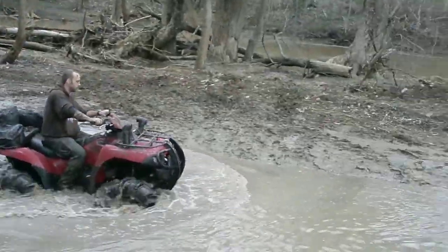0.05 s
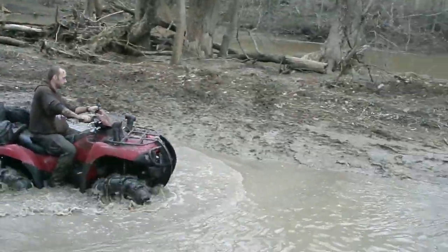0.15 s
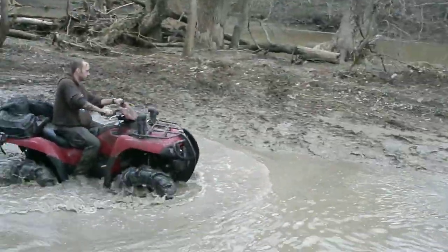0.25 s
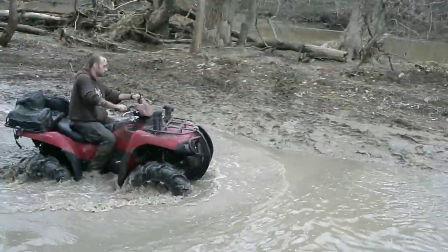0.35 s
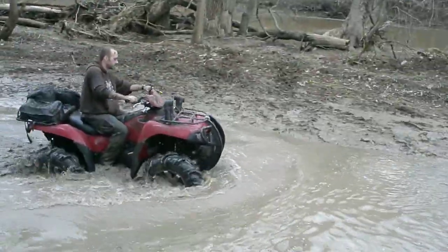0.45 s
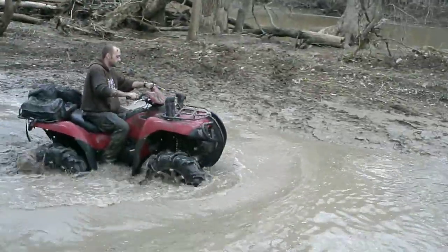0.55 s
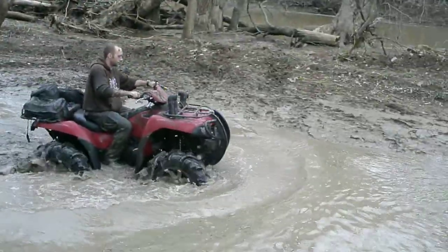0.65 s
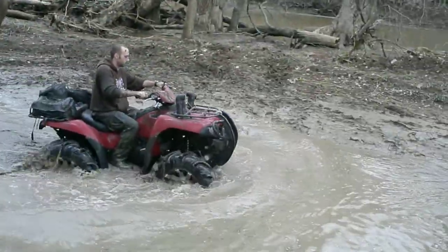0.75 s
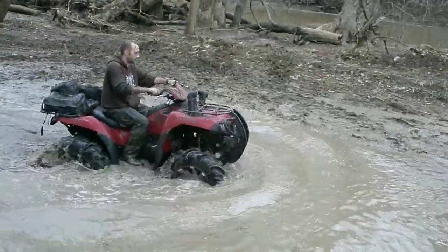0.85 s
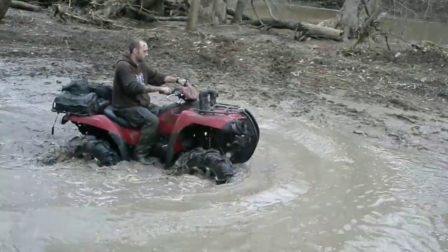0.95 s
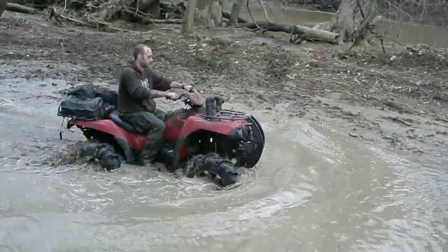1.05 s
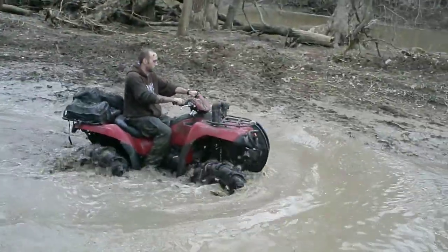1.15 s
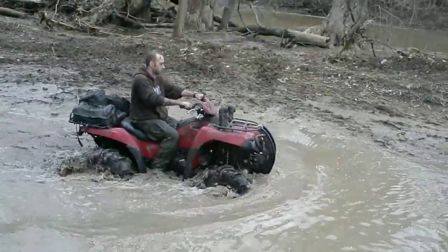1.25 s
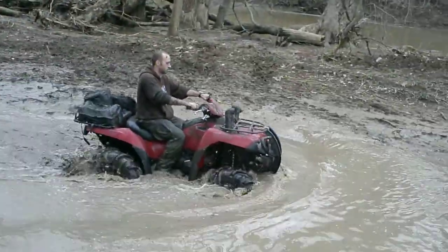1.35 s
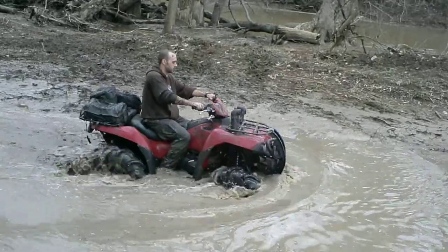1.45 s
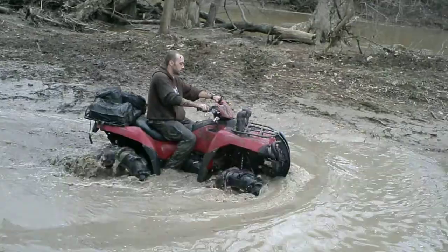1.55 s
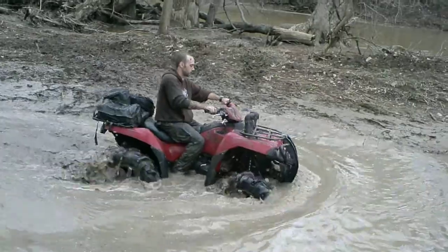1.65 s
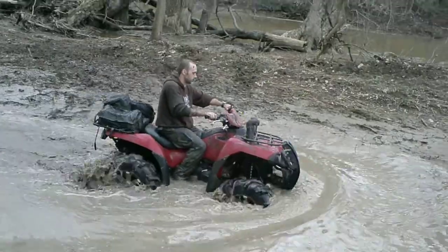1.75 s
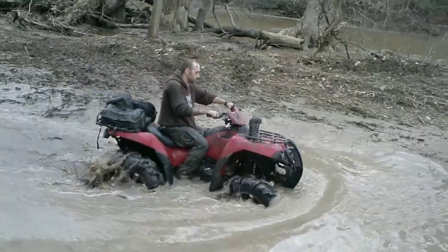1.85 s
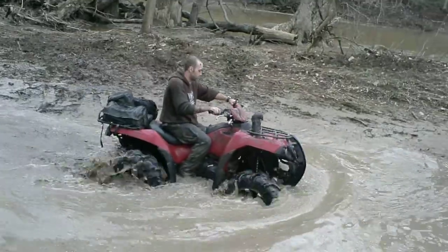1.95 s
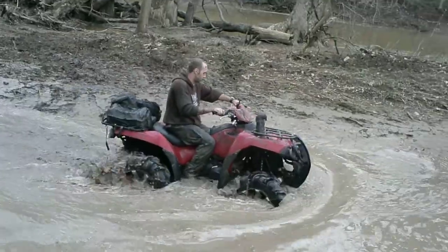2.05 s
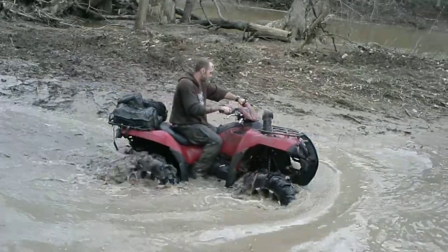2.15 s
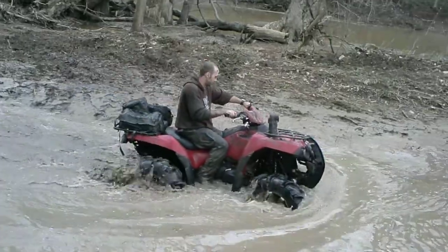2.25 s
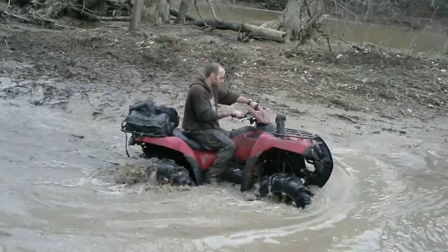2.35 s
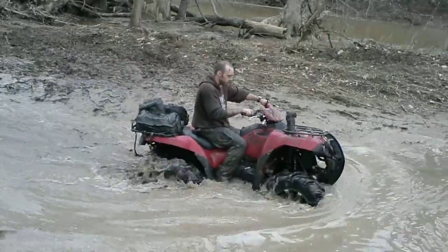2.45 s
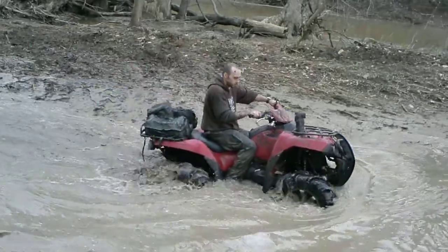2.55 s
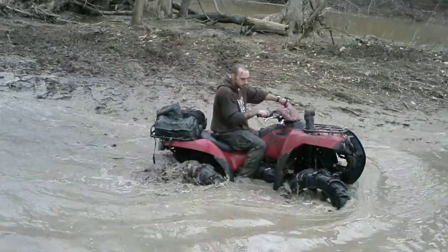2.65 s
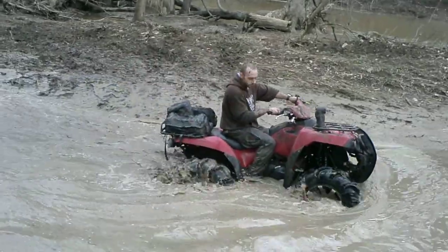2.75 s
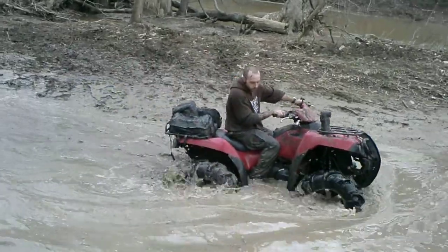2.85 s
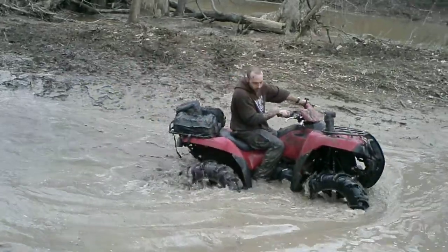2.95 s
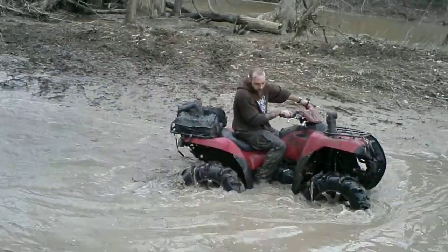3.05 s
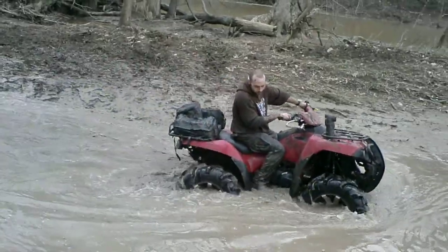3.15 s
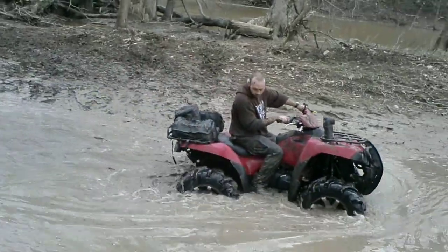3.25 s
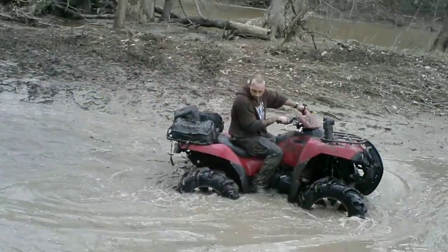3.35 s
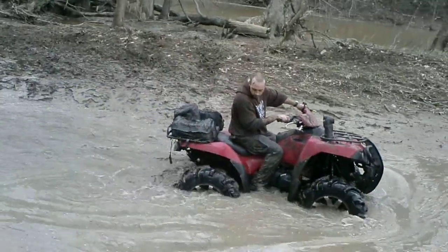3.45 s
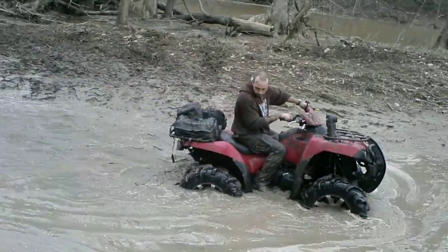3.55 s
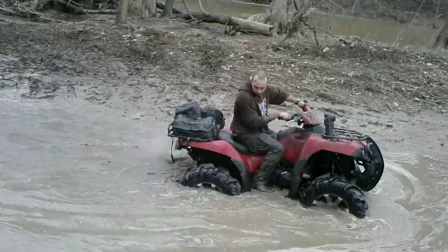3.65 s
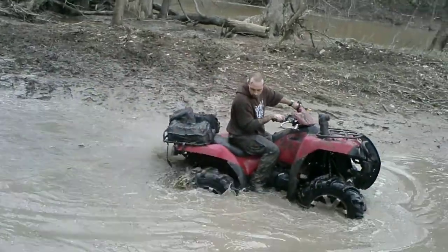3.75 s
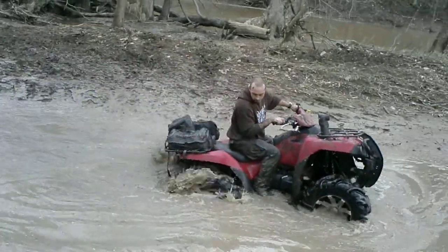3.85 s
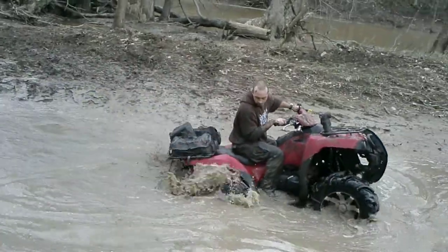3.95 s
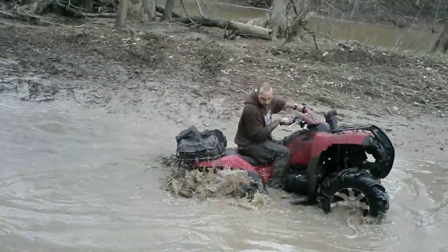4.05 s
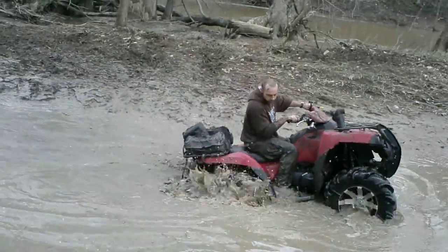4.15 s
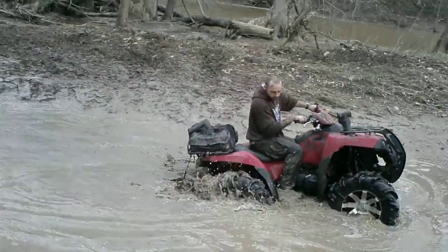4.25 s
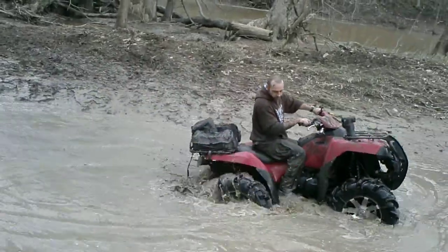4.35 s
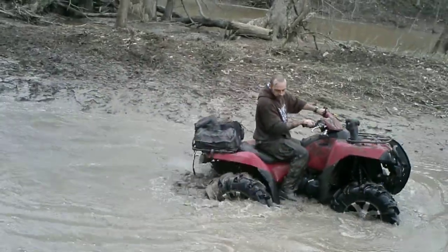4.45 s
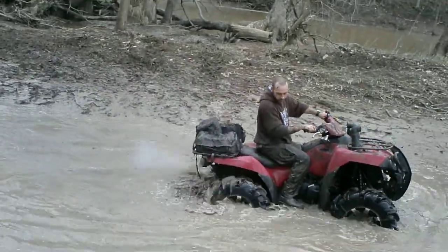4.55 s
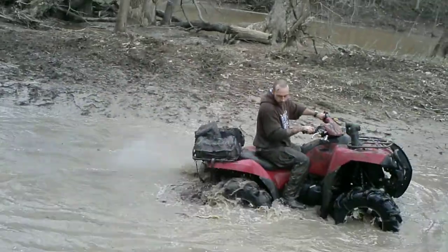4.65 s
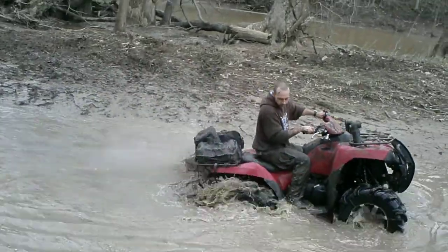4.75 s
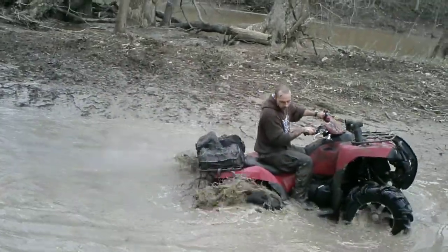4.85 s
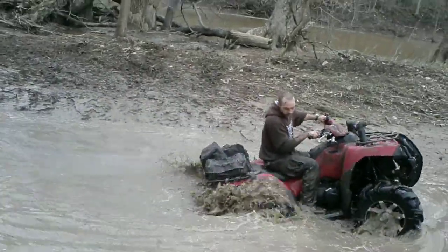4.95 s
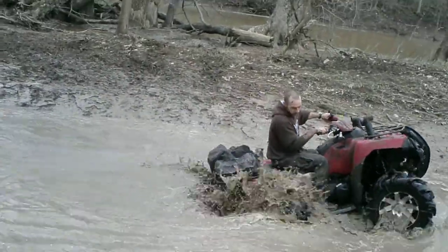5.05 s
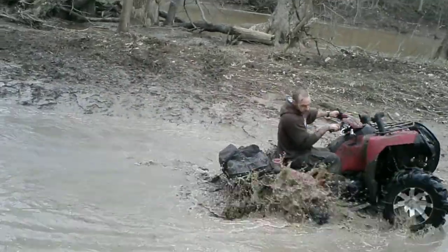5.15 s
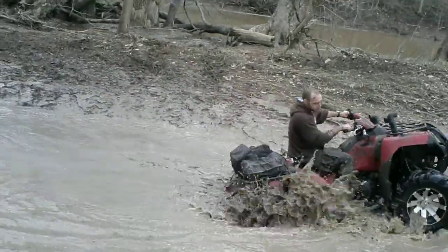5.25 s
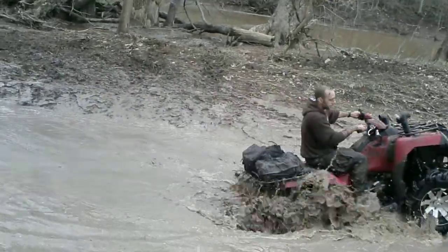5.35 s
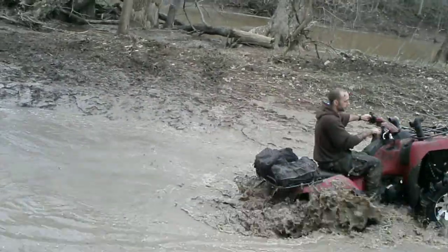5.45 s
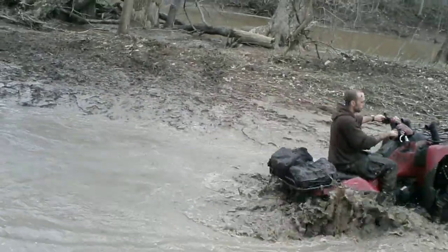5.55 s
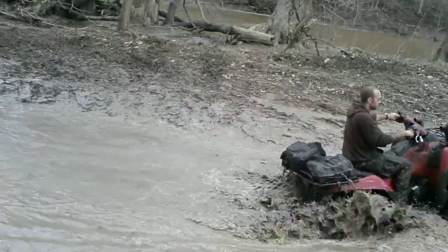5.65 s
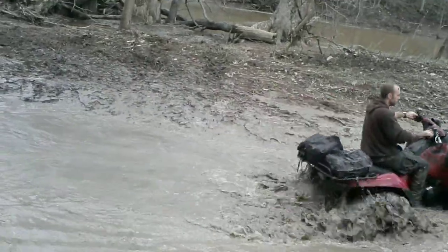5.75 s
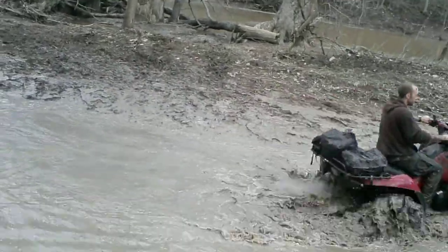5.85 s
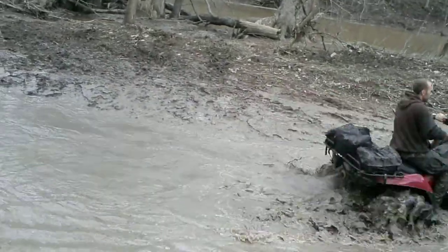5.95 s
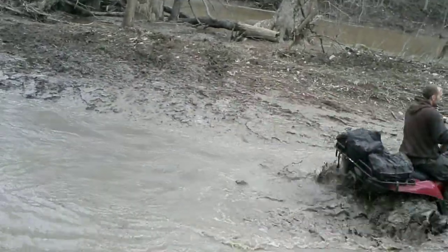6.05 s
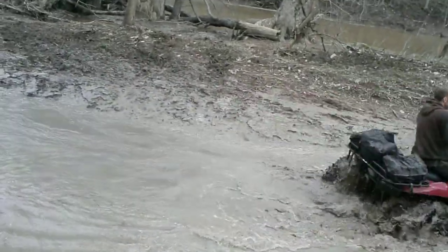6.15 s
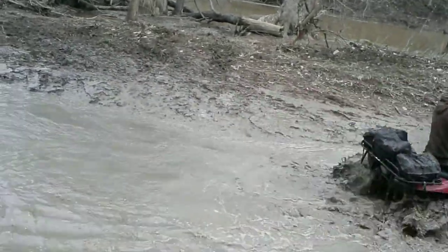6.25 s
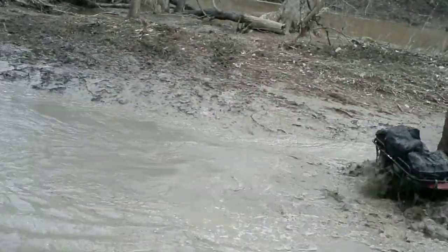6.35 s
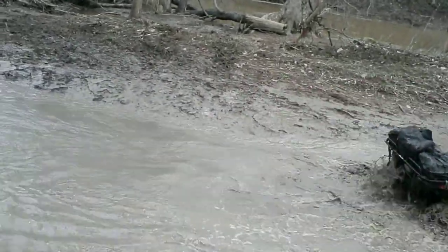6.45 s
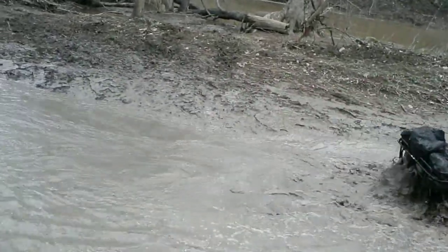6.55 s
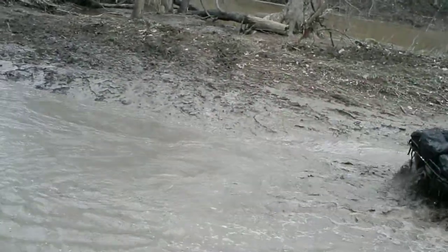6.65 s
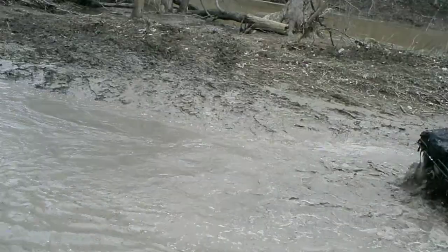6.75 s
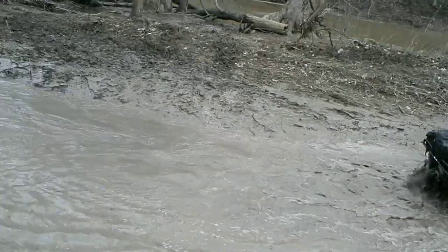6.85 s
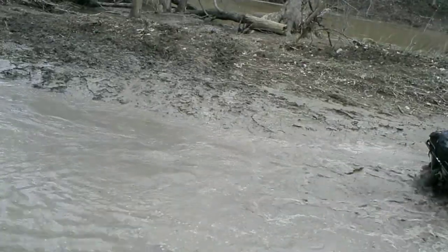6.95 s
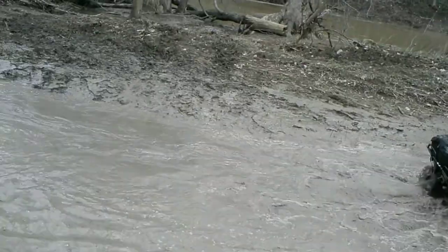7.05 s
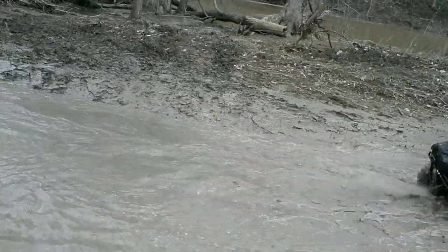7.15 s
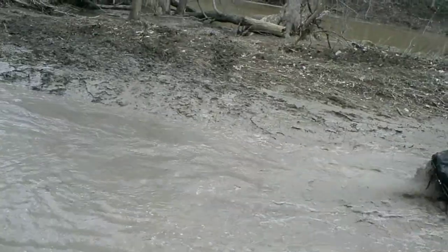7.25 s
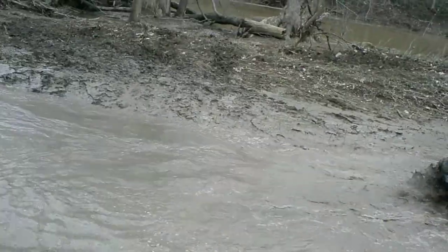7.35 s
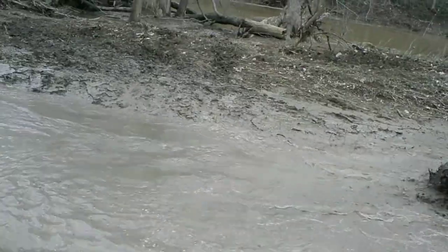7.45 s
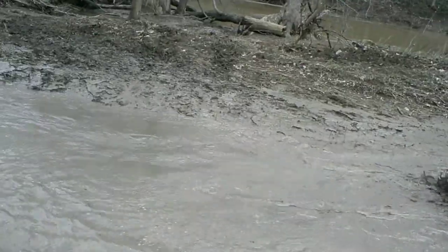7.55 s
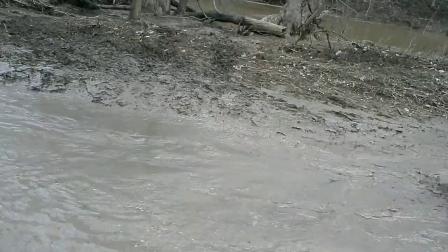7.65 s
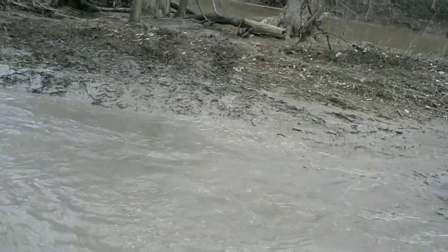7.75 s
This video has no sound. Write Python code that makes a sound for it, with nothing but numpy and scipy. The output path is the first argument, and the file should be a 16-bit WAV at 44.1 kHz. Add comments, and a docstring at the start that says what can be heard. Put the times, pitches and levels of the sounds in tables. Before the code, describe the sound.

A quad bike's uneven twin-cylinder engine labours through muddy water, drops to a lumpy idle, then barks in repeated throttle bursts amid splashes and churning.

```python
"""A quad bike with a V-twin engine cruises unevenly through muddy water in open woods, wash and splashes around it.
After some 2.7 s it drops to idle; from 3.5 s the rider blips the throttle again and again and mud keeps flying.
Near 5 s, as the revs drop, the drive belt squeals once. Dull echoes follow every sound; loud peaks are cut flat.
Each firing sends a pulse down the exhaust, where it echoes and rings tuned modes, and rasps in the headers.
Gas roar and water are coloured noise, partly puffing with the firings."""
import sys
import numpy as np
from scipy import signal
from scipy.fft import rfft, irfft, next_fast_len
from scipy.io import wavfile
from scipy.ndimage import uniform_filter1d

SR = 44100
rng = np.random.default_rng(int(sys.argv[2]) if len(sys.argv) > 2 else 0)


def volts_from_db(level):
    """Convert decibel levels to linear amplitude ratios."""
    exponent = np.asarray(level, float) / 20
    return 10 ** exponent


def log_audio(samples):
    """Write samples as a 16-bit WAV file to the path given in sys.argv[1]."""
    # one column per channel
    frames = np.atleast_2d(samples).T
    # limit to full scale, then quantise
    limited = np.clip(frames, -1, 1)
    pcm = np.round(limited * 32767).astype(np.int16)
    wavfile.write(sys.argv[1], SR, pcm)


N = 343539   # length in samples
CRUISE_THROTTLE = 0.095
IDLE_RPM = 1400
RISE_S = .0038   # from valve opening to the crest of the pulse


def rms_one(x):
    """Scale to rms 1."""
    return x / np.sqrt(np.mean(x ** 2) + 1e-20)


def in_time(rows):
    """Each column of a curve table, interpolated at every sample."""
    s, *columns = np.transpose(rows)
    return [np.interp(np.arange(N) / SR, s, c) for c in columns]


def coloured(x, spectrum):
    """Filter x by a (Hz, dB) curve, then bring it to rms 1."""
    size = next_fast_len(N)
    hz, db = np.transpose(spectrum)
    bins_hz = np.arange(size // 2 + 1) * SR / size
    gain = volts_from_db(np.interp(np.log(bins_hz + 1), np.log(hz), db))
    return rms_one(irfft(rfft(x, size) * gain, size)[:N])


def fading(x, seconds):
    """One-pole decay: each click leaves an exponential tail with this time constant."""
    return signal.lfilter([1], [1, -np.exp(-1 / (seconds * SR))], x + 1e-18)


def drift(rate):
    """Random wander with spread 1: noise twice smoothed at this rate in Hz."""
    tail_s = 1 / (2 * np.pi * rate)
    slow = fading(fading(rng.standard_normal(N + SR), tail_s), tail_s)
    return rms_one(slow[SR:])   # the first second lets the filters settle


def evened(x, rpm):
    """Level made independent of how often the engine fires."""
    return rms_one(x / np.sqrt(rpm))


def power_sum(*dbs):
    """Levels of unrelated sounds added, in dB."""
    return 20 * np.log10(np.sqrt(sum(volts_from_db(db) ** 2 for db in dbs)))


# Crankshaft speed before the flywheel rounds it. Each row: time in seconds, speed in rpm.
CRANK = [(0.0, 2640), (0.26, 2122), (0.64, 2752), (1.1, 2897), (1.41, 2449), (1.73, 3181), (2.03, 2737),
         (2.27, 3020), (2.57, 2707), (2.74, 1768), (3.02, 1365), (3.51, 1453), (3.75, 4575), (3.83, 4845),
         (4.07, 2517), (4.41, 1331), (4.6, 3648), (4.92, 5731), (5.14, 4106), (5.36, 4882), (5.58, 2583),
         (5.75, 1875), (5.99, 4136), (6.17, 3227), (6.47, 2955), (6.65, 1970), (6.83, 1540), (7.09, 4618),
         (7.24, 5533), (7.5, 2766), (7.62, 2481), (7.79, 3904)]


def crank_speed():
    """Engine speed in rpm; flywheel inertia rounds every turn of it."""
    flywheel_s = .06
    return uniform_filter1d(in_time(CRANK)[0], round(flywheel_s * SR), mode="nearest")


def firings(rpm):
    """Valve-opening sample and strength of each firing: two per 720 degrees, unevenly spaced."""
    start_cycles = -.62   # crank position at the start, in four-stroke cycles
    second_cylinder = .365   # cycles after the first: the uneven beat of a V-twin
    second_db, spread_db = .5, .8
    cycles = start_cycles + np.cumsum(rpm / 120) / SR
    whole = np.arange(int(cycles[-1]) + 1)
    marks = np.stack([whole, whole + second_cylinder], axis=1).ravel()
    marks = marks[marks < cycles[-1]]
    db = second_db * (np.arange(len(marks)) % 2) + spread_db * rng.standard_normal(len(marks))
    at = np.searchsorted(cycles, marks) - round(RISE_S * SR)
    return np.clip(at, 0, N - 200), volts_from_db(db)


def opening(opens, shuts):
    """0 to 1 while the throttle is held: the thumb snaps it open, the spring eases it shut."""
    opening_s, shutting_s = .012, .08   # shuts is the moment when it is half way back
    s = np.arange(N) / SR
    return np.clip(np.minimum((s - opens) / opening_s, (shuts - s) / shutting_s + .5), 0, 1)


# Throttle openings. Each row: opens in seconds, half shut in seconds, throttle from 0 to 1,
# gas roar at the opening in dB, basic low boom in dB against the pulses.
BLIPS = [(3.542, 3.807, 0.86, -12, 2), (4.452, 4.754, 0.66, -17, -1), (4.843, 4.99, 0.05, -25, 3.5),
         (5.155, 5.342, 0.6, -15.5, 3.5), (5.795, 6.02, 0.44, -39, -13), (6.853, 7.263, 0.71, -18, -0.5),
         (7.605, 7.762, 0.53, -17.5, -6)]


def rider(rpm):
    """Throttle, overrun share, and the boom, gas roar and crack levels that follow the openings."""
    roar_swell_db_per_s = 11.5   # the roar grows while the throttle is held
    crack_db = -17.5   # treble of the gas puffs against their opening roar
    kick_db, kick_s = 4, 0.35   # the first firings of an opening crack harder
    overrun_rpm_per_s = 6630   # slowing this fast is a full overrun
    cruise_boom_db, idle_boom_db, overrun_boom_db, boom_wander_db = 1.5, 4.5, 6, 3
    throttle, boom_db = np.full(N, CRUISE_THROTTLE), np.full(N, cruise_boom_db)
    gas, crack = np.full(N, 1e-6), np.full(N, 1e-6)
    for opens, shuts, depth, roar_db, low_db in BLIPS:
        held = opening(opens, shuts)
        since = np.clip(np.arange(N) / SR - opens, 0, 1)
        throttle += held * (depth - CRUISE_THROTTLE)
        gas += held * volts_from_db(roar_db + roar_swell_db_per_s * since)
        crack += held * volts_from_db(roar_db + crack_db + kick_db * np.exp(-since / kick_s))
        boom_db += held * (low_db - cruise_boom_db)
    slowing = np.clip(-np.gradient(rpm) * SR / overrun_rpm_per_s, 0, 1)
    overrun = slowing ** 2 * (1 - throttle)
    boom_db += idle_boom_db * (IDLE_RPM / rpm) ** 2 + overrun_boom_db * overrun
    boom_db += boom_wander_db * drift(2.0)
    return throttle, overrun, boom_db, 20 * np.log10(gas), 20 * np.log10(crack)


def pipe_gas(rpm, throttle, overrun):
    """Echo round trip in ms, echo share and turbulence in dB of the gas in the pipe."""
    # hot gas at speed carries sound faster; unburnt or freshly opened gas is cooler
    hot_trip_ms, idle_extra_ms, overrun_extra_ms, open_extra_ms = 5.313, 4.21, 1.3, 1
    slow = (IDLE_RPM / rpm) ** 1.405
    trip_ms = hot_trip_ms + idle_extra_ms * slow + overrun_extra_ms * overrun + open_extra_ms * throttle
    # an open throttle damps the echo
    echo = np.clip(0.59 - 0.56 * throttle - 0.16 * overrun, .03, .9)
    # least turbulence at an even cruise, most on the overrun
    cruise_db, idle_more_db, open_more_db, overrun_more_db = -26, 6, 11, 15
    turbulence_db = cruise_db + idle_more_db * slow ** 2
    turbulence_db += open_more_db * np.sqrt(throttle) + overrun_more_db * overrun
    return trip_ms, echo, turbulence_db


# How hard the cylinders fire. Each row: time in seconds, level of the exhaust pulses in dB.
EFFORT = [(0.0, -14), (0.19, -16.5), (0.5, -11.5), (2.56, -12.5), (2.84, -27), (3.47, -20.5), (3.56, -6.5),
          (3.82, -14), (3.86, -20.5), (4.27, -30.5), (4.32, -21), (4.42, -27), (4.47, -9), (4.75, -5.5),
          (4.9, -15.5), (4.95, -14), (5.01, -34), (5.08, -22.5), (5.21, -5.5), (5.29, -6), (5.49, -22),
          (5.6, -15), (5.73, -20.5), (5.75, -2), (5.77, -25), (5.81, -4), (6.09, -15), (6.4, -12.5),
          (6.75, -23), (6.81, -23), (6.88, -4.5), (7.24, -11.5), (7.31, -22.5), (7.62, -11), (7.68, 3),
          (7.79, -15.5)]


def effort():
    """Exhaust pulse level in dB, following the work of the cylinders."""
    return in_time(EFFORT)[0]


def ringing(flow, modes):
    """Parallel modes driven by a soft-edged flow; the tail pipe passes no deep bass."""
    flow, out = fading(flow, .0003), 0
    for hz, db, t60, polarity in modes:
        r = volts_from_db(-60 / (t60 * SR))
        w = 2 * np.pi * hz / SR
        mode = signal.lfilter([0, np.sin(w)], [1, -2 * r * np.cos(w), r * r], flow)
        out = out + polarity * volts_from_db(db) * mode
    return signal.sosfilt(signal.butter(3, 58, "high", fs=SR, output="sos"), out)


# Boom of the silencer can.
# Each row: frequency in Hz, relative level in dB, 60 dB decay in seconds, signed weight.
CAN = [(53.3, -25.5, 0.21, 0.84), (95, -6, 0.035, 0.79), (143.7, -16, 0.058, -0.7)]
# Bark of the silencer chambers.
# Each row: frequency in Hz, relative level in dB, 60 dB decay in seconds, signed weight.
CHAMBERS = [(170.7, -19, 0.19, 0.76), (207, 7.5, 0.011, -1.033), (262.3, -17.5, 0.049, -1.81),
            (295.7, 2, 0.018, 1), (349.4, -16, 0.087, 1), (421.7, -23.5, 0.015, -0.96),
            (550, -35, 0.051, 1), (676, -29, 0.0077, -0.41)]


def exhaust(at, strength, rpm, pulse_db, boom_db, gas):
    """Each pulse runs up and down the pipe and rings the silencer, over turbulent rumble."""
    trip_ms, echo, turbulence_db = gas
    flow = np.zeros(N)
    # even power whatever the firing rate and echo share
    size = strength * volts_from_db(pulse_db[at]) * np.sqrt((1 - echo[at] ** 2) / rpm[at])
    for k in range(7):   # the pulse and six echoes
        late = np.minimum(at + np.round(k * trip_ms[at] * SR / 1000).astype(int), N - 1)
        np.add.at(flow, late, size * echo[at] ** k)
    pulses = ringing(flow, CHAMBERS) + ringing(flow * volts_from_db(boom_db), CAN)
    pulses *= np.sqrt(np.mean(volts_from_db(pulse_db) ** 2) / np.mean(pulses ** 2))
    # unsteady flow rings all but the lowest can mode, without a beat
    rumble = rms_one(ringing(rng.standard_normal(N), CHAMBERS + CAN[1:]))
    return pulses + volts_from_db(pulse_db + turbulence_db) * rumble


# Rasp of the header pipes.
# Each row: frequency in Hz, relative level in dB, 60 dB decay in seconds, signed weight.
HEADERS = [(477, 5, 0.0047, 1), (590, -11.5, 0.027, -1.02), (709, -1.5, 0.0089, 0.88),
           (820, 2, 0.0082, -0.78), (970, -2, 0.0056, 0.77), (1350, -19, 0.0069, -0.6),
           (2200, -3, 0.011, 1)]


def rasp(at, strength, rpm, throttle, pulse_db):
    """The same header ring at every firing, so the upper harmonics glide with the revs."""
    base_db, open_db, db_per_krpm = -29, 10, 2.5   # against the pulses; more with throttle and speed
    clicks = np.zeros(N)
    clicks[at + round(RISE_S * SR / 2)] = strength
    level_db = pulse_db + base_db + open_db * throttle + db_per_krpm * rpm / 1000
    return volts_from_db(level_db) * evened(ringing(clicks, HEADERS), rpm)


# Wash round the wading wheels. Each row: time in seconds, level in dB.
WASH = [(0, -35), (.4, -35.5), (.7, -40.5), (2.5, -39.5), (3.4, -45), (4.8, -42.5), (6.1, -48),
        (7.79, -39.5)]
# Mud thrown by the tyres. Each row: peak time in seconds, peak level in dB,
# rise in dB per second, decay in dB per second (negative keeps growing).
SPLASHES = [(.8, -39.5, 60, 24), (1.34, -37.5, 72, 12), (1.95, -48, 68, -2), (2.635, -33, 500, 37),
            (3.989, -30.5, 56, 50), (4.29, -35.5, 16, 45), (5.14, -28, 77, 56), (5.53, -31.5, 75, 58),
            (5.75, -30, 42, 38), (6.33, -38.5, 43, 44), (6.57, -34.5, 200, 7), (7.42, -36, 50, 20)]


def churn():
    """Level of the water in dB: wash plus splashes that rise, change and end."""
    lasts_s, end_db_per_s = 0.26, 80   # after this the last drops fall away
    s = np.arange(N) / SR
    throws = []
    for peak, db, rising, dying in SPLASHES:
        slope = np.where(s < peak, rising * (peak - s), dying * (s - peak))
        ending = end_db_per_s * np.maximum(s - peak - lasts_s, 0)
        throws.append(db - slope - ending)
    return power_sum(in_time(WASH)[0], *throws)


def rushing(at, strength, rpm, puffed, seconds, steady):
    """Noise that is partly steady, partly a quick puff at the crest of each firing."""
    clicks = np.zeros(N)
    clicks[at + round(.0028 * SR)] = strength * volts_from_db(0.63 * rng.standard_normal(len(at)))
    puffs = evened(fading(fading(clicks, seconds), 0.00008), rpm)
    puffed = np.clip(puffed, 0, 1)
    return np.sqrt(1 - puffed) * steady + np.sqrt(puffed) * puffs * rng.standard_normal(N)


# Colour of the gas roar and mid-range rush. Each row: frequency in Hz, relative density in dB per Hz.
ROAR = [(25, -22), (90, 2), (310, 6), (520, -7), (676, -2.5), (725, -7.5), (812, -2), (934, -6),
        (1180, -13), (1410, -9), (1690, -17.5), (2070, -12.5), (2420, -24.5), (2810, -17), (3120, -61),
        (3410, -28), (4200, -40), (5460, -70), (9240, -120)]


def roar(at, strength, rpm, throttle, gas_db, water_db):
    """Gas rushing through intake and tail pipe, puffing more as the throttle opens."""
    churn_db = 10.5   # mid-range rush of the labouring drive, against the wash and splashes
    steady = rng.standard_normal(N) * volts_from_db(2.35 * drift(3.2))
    rush = rushing(at, strength, rpm, 0.72 * throttle, seconds=0.0038, steady=steady)
    return volts_from_db(power_sum(gas_db, water_db + churn_db)) * coloured(rush, ROAR)


# Colour of the water and the gas crack. Each row: frequency in Hz, relative density in dB per Hz.
SPRAY = [(1760, -1), (3000, 0), (3130, -5.5), (3370, -2.5), (3740, -13), (4350, -12), (5810, -12),
         (6770, -7.5), (8850, -14), (10200, -13), (11200, -15.5), (12000, -22), (12900, -19.5),
         (14500, -27), (15600, -30)]


def spray(at, strength, rpm, throttle, water_db, crack_db):
    """Dense drops in clumps over smooth hiss, with the bright crack of the gas puffs."""
    sizes = volts_from_db(3.9 * np.minimum(rng.exponential(1, N), 5))
    born = rng.random(N) < 250 * volts_from_db(5.0 * drift(12)) / SR   # around 250 drops a second, in clumps
    drops = fading(sizes * born, 0.0031) * rng.standard_normal(N)   # each a short splat
    hiss = rng.standard_normal(N) * volts_from_db(0.79 * drift(24))
    water = rms_one(hiss + 0.68 * rms_one(drops))
    rush = rushing(at, strength, rpm, 1.09 * throttle, seconds=.0045, steady=water)
    return volts_from_db(power_sum(water_db, crack_db)) * coloured(rush, SPRAY)


def belt():
    """The drive belt squeals once as the revs drop: a short falling tone that wavers."""
    centre_s, lasts_s, centre_hz, fall_hz_per_s, level_db = 5.035, .05, 1960, 2500, -37
    since = np.arange(N) / SR - centre_s
    turns = centre_hz * since - fall_hz_per_s * since ** 2 / 2
    swell = np.exp(-(2 * since / lasts_s) ** 2)
    return volts_from_db(level_db + 3.6 * drift(40)) * swell * np.sin(2 * np.pi * turns)


def woods(x):
    """A few dull echoes off bank and trunks."""
    dull, out = fading(x, 0.00009) / (0.000097 * SR), x.copy()
    for s, db in [(.031, -31.5), (.057, -20.5), (.094, -22.5)]:
        delay = round(s * SR)
        out[delay:] += volts_from_db(db) * dull[:N - delay]
    return out


def scene():
    """Engine, belt and water from one direction, with the echoes of the woods."""
    rpm = crank_speed()
    throttle, overrun, boom_db, gas_db, crack_db = rider(rpm)
    pulse_db, water_db = effort(), churn()
    at, strength = firings(rpm)
    gas = pipe_gas(rpm, throttle, overrun)
    mix = exhaust(at, strength, rpm, pulse_db, boom_db, gas)
    mix = mix + rasp(at, strength, rpm, throttle, pulse_db)
    mix = mix + roar(at, strength, rpm, throttle, gas_db, water_db)
    mix = mix + spray(at, strength, rpm, throttle, water_db, crack_db)
    mix = mix + belt()
    return woods(mix)[None]


def low_pass(x):
    """Removes everything above the highest recorded frequency."""
    return signal.sosfilt(signal.butter(12, 15730, fs=SR, output="sos"), x)


def record(dry):
    """Overload cuts the peaks almost flat; a small constant offset follows."""
    overload, offset, hard = .71, -.0039, 14   # a higher hard gives a sharper corner
    cut = dry / (1 + np.abs(dry / overload) ** hard) ** (1 / hard)
    return low_pass(cut + offset)


dry = scene()
out = record(dry)
log_audio(out)
```